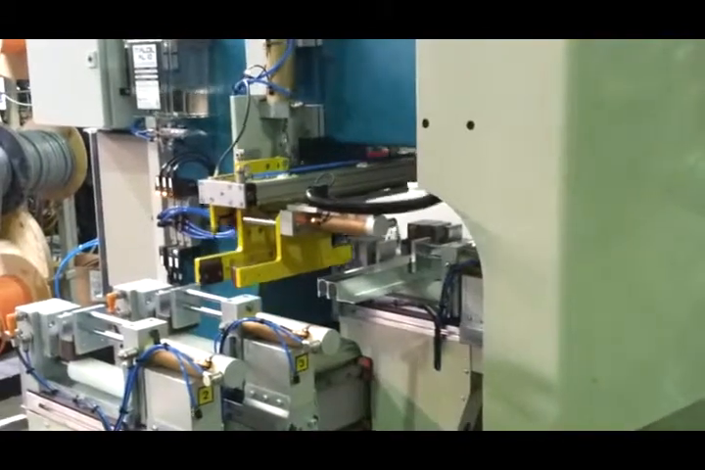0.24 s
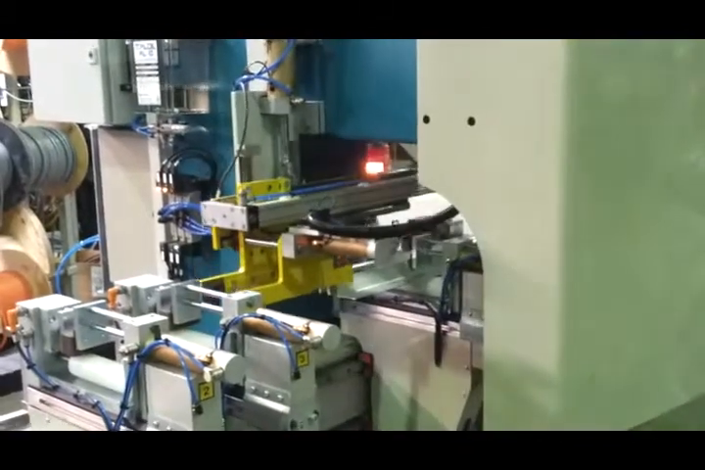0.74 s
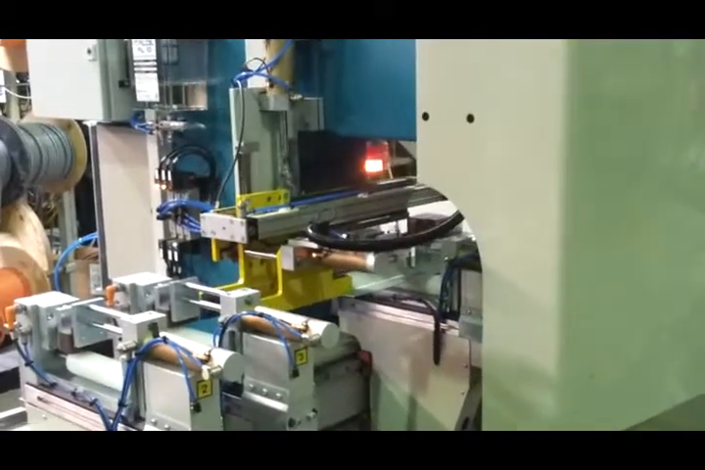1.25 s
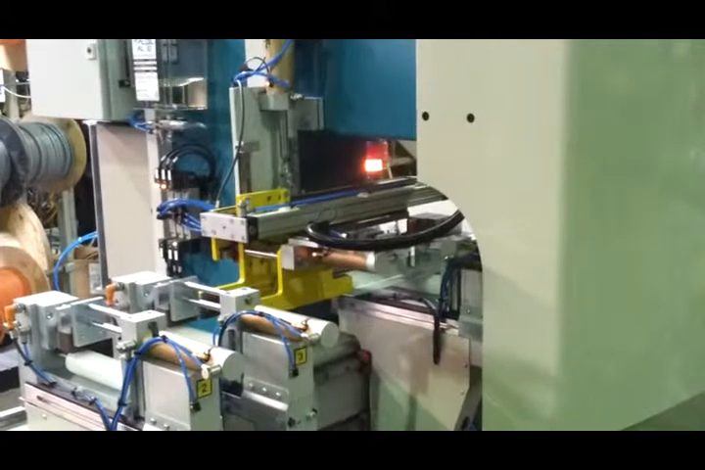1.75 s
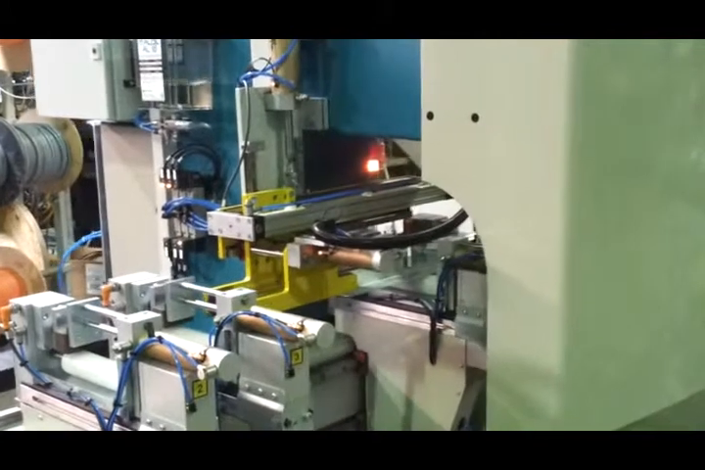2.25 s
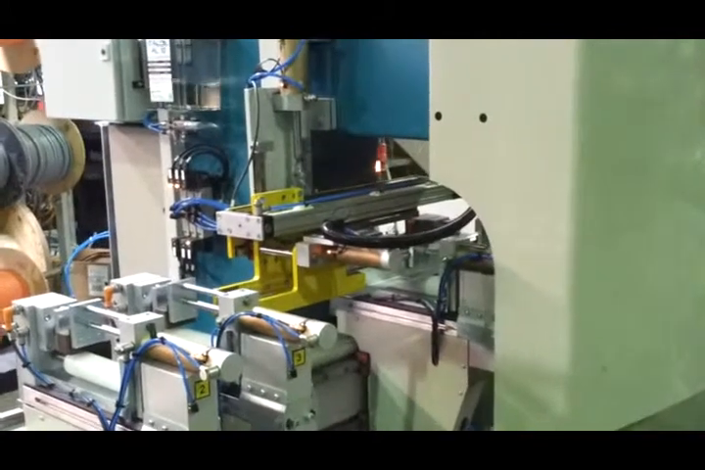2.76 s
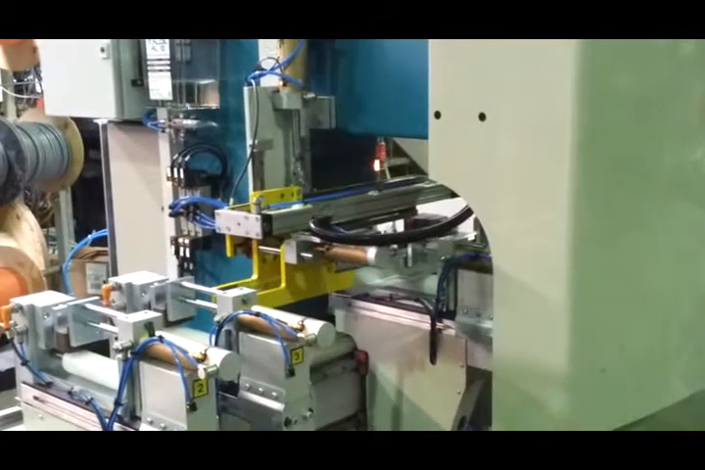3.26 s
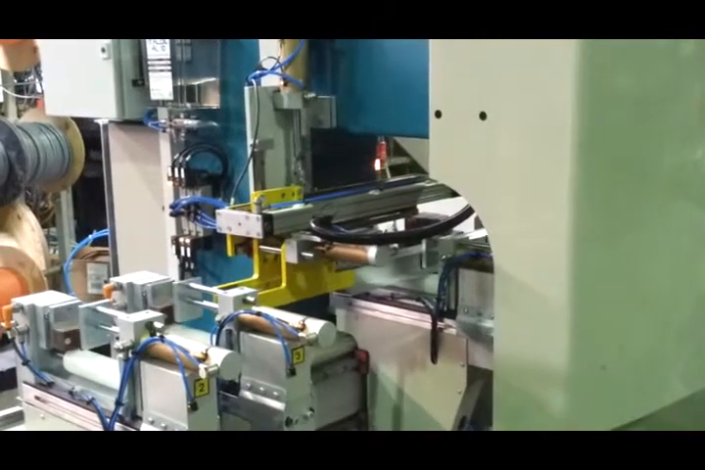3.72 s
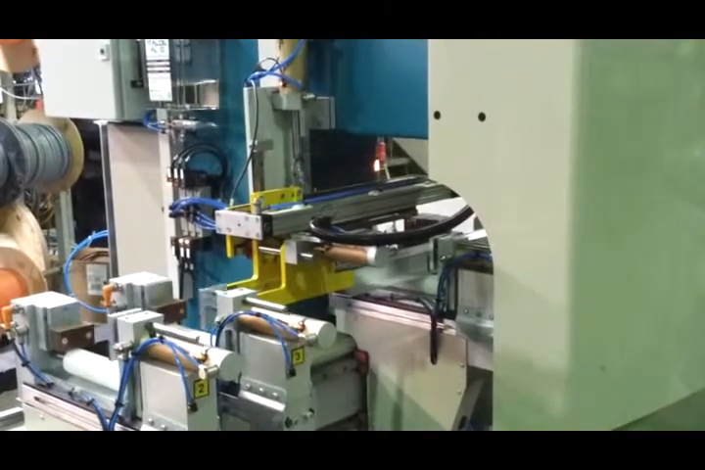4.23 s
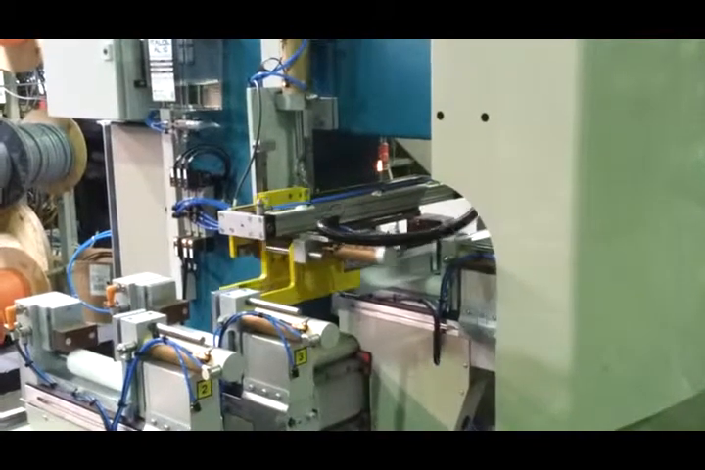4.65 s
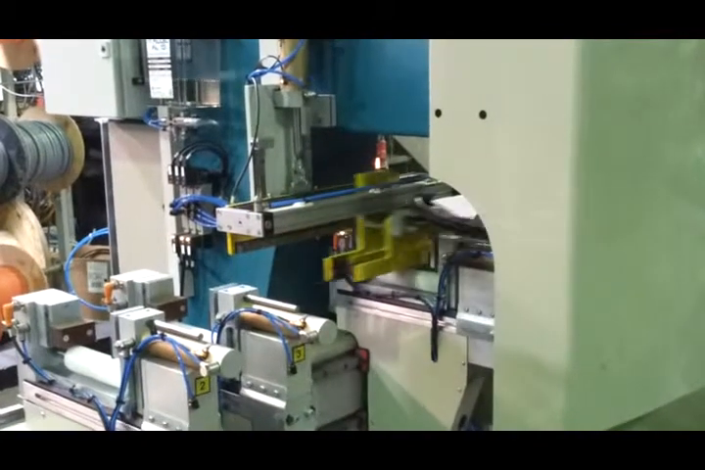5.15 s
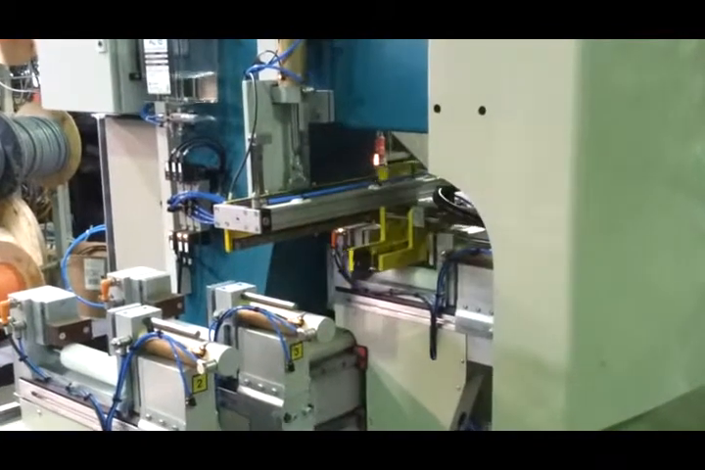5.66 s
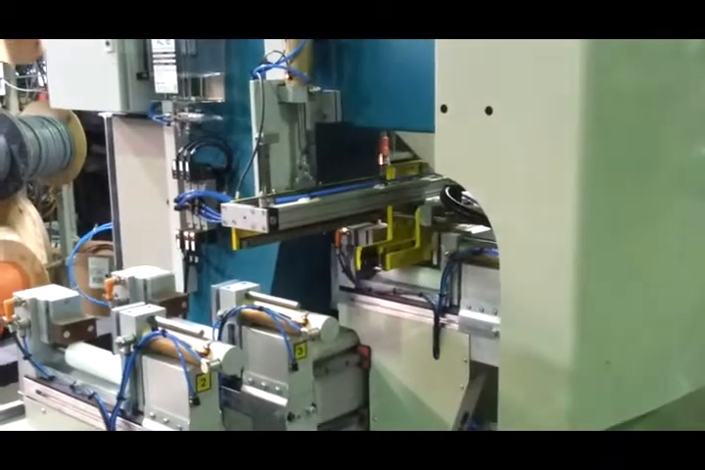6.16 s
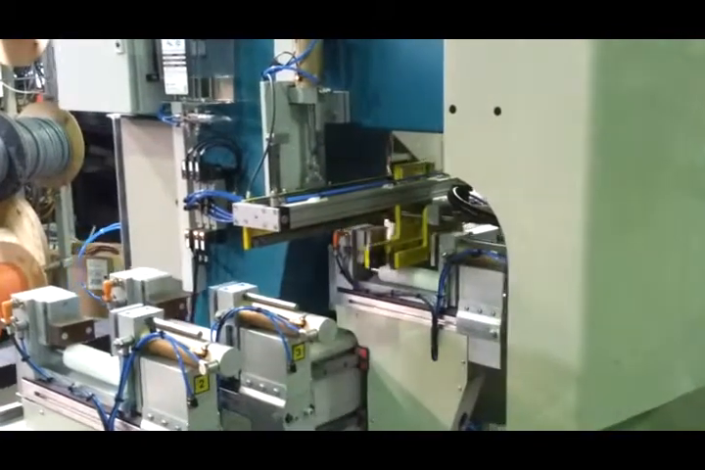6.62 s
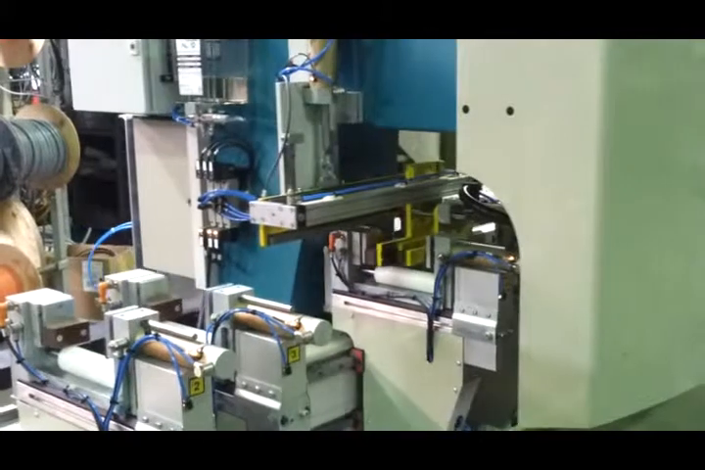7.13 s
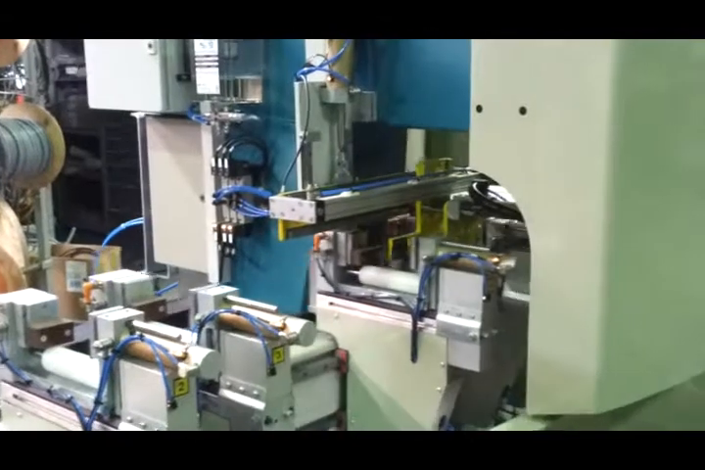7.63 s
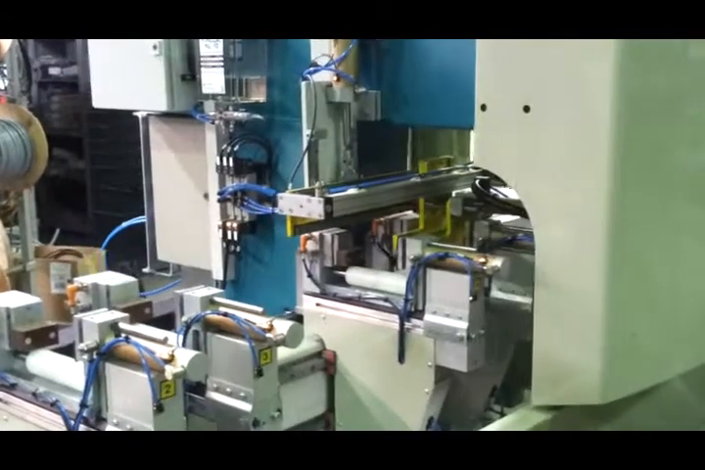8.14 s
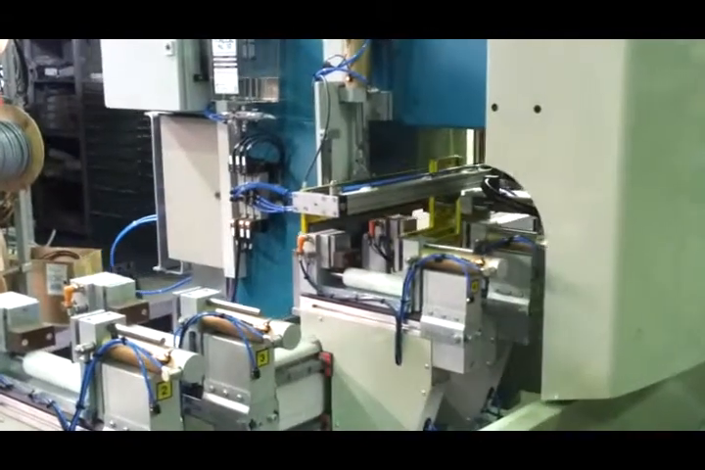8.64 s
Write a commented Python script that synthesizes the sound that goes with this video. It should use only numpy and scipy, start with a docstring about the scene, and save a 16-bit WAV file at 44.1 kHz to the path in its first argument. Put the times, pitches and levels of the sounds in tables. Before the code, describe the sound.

Close stereo pickup of pneumatic machinery in a large workshop, bright and light on bass. A valve puff and falling spindle whine open it, followed by soft thumps and another sharp spit. A chip nozzle blows gently, then only hiss and hum remain. Later, paired air cracks release a strong fading exhaust as a slide rumbles; irregular metal knocks, clacks and whistling puffs continue to the end, with short dull reverberation.

```python
"""A spindle brakes to rest in a falling whine, amid blowing air and the hiss and hum of a large machining hall.
Valves vent with sharp whistling puffs; clamps, levers and slides knock at their end stops.
Cylinders exhaust in long blows, a nozzle blows chips off the work, tones pass and the floor shudders.
Air is spectrally shaped noise, whistles are noisy carriers, knocks are sums of short-lived noisy modes."""
import sys
import numpy as np
from scipy import signal
from scipy.fft import rfft, irfft
from scipy.io import wavfile

SR = 44100
rng = np.random.default_rng(int(sys.argv[2]) if len(sys.argv) > 2 else 0)


def master_out(mix):
    """Clip the mix to full scale and print it as 16-bit PCM to the path in sys.argv[1]."""
    frames = np.transpose(np.atleast_2d(mix))
    ceiling = np.clip(frames, -1, 1)
    pcm = np.round(ceiling * 32767).astype(np.int16)
    wavfile.write(sys.argv[1], SR, pcm)


N = 392049
T = np.arange(N) / SR
HZ = np.fft.rfftfreq(N, 1 / SR)


def amp(db):
    """dB to gain."""
    return 10 ** (np.asarray(db) / 20)


def rms_one(x):
    """Scale to rms 1, both sides together."""
    return x / np.sqrt(np.mean(x ** 2) + 1e-20)


def at_hz(points):
    """Read a table on a log-frequency axis."""
    hz, value = np.transpose(points)
    return np.interp(np.log(HZ + 1), np.log(hz), value)


def panned(left_minus_right_db):
    """Left and right gains."""
    return amp([[left_minus_right_db / 2], [-left_minus_right_db / 2]])


def add(out, start_s, sound):
    """Mix a sound in at a time."""
    i = round(start_s * SR)
    out[..., i:i + sound.shape[-1]] += sound[..., :N - i]


# Left-right likeness of noise. Each row: frequency in Hz, correlation from 0 to 1.
LIKENESS = [(100, 0.75), (300, 0.88), (700, 1), (1500, 0.29), (3000, 0.034), (14000, 0.2)]


def hiss(spectrum, ripple_db):
    """Stereo noise, rms 1, alike in the bass; its spectrum is made uneven by random ripples."""
    mid, side = rfft(rng.standard_normal((2, N)))
    alike = np.clip(at_hz(LIKENESS), 0, 1)
    knots_hz = np.arange(0, SR / 2, 30)
    ripple = np.interp(HZ, knots_hz, rng.standard_normal(len(knots_hz)))
    pair = np.sqrt(1 + alike) * mid + np.sqrt(1 - alike) * side * [[1], [-1]]
    return rms_one(irfft(pair * amp(at_hz(spectrum) + ripple_db * ripple), N))


def whistle(hz, width_hz, alike, steady=0.0):
    """Noisy stereo tone on a pitch curve: slow complex noise plus a steady part on a carrier, rms 1."""
    r = np.exp(-np.pi * width_hz / SR)
    settle = 2000  # samples
    draw = rng.standard_normal((2, 3, len(hz) + settle))
    slow = signal.lfilter([1], [1, -2 * r, r * r], draw[0] + 1j * draw[1])[:, settle:]
    pair = np.sqrt(alike) * slow[0] + np.sqrt(1 - alike) * slow[1:]
    pair = pair / np.sqrt(np.mean(np.abs(pair) ** 2)) + steady
    cycles = np.cumsum(hz) / SR + rng.random()
    return rms_one(np.real(pair * np.exp(2j * np.pi * cycles)))


# Valve puffs. Each row: start in seconds, gust level in dB, opening time in seconds, hold in seconds,
# gust t60 in seconds, settled whistle pitch in Hz, its level in dB, settled upper whistle pitch in Hz,
# its level in dB, lingering whistle level in dB, left minus right in dB.
PUFFS = [(0.183, -27, 0.0014, 0.034, 0.2, 5780, -18, 10200, -18.5, -27, -1),
         (1.076, -38, 0.0027, .017, 0.2, 5950, -38, 10600, -47, -48, 3),
         (1.962, -18, 0.0013, 0.022, 0.13, 5570, -12, 11300, -14.5, -21, 1),
         (4.929, -19, 0.0015, 0.017, 0.6, 5960, -12, 10950, -12.5, -40, -0.5),
         (5.229, -16, 0.01, 0.017, 0.33, 5850, -8, 10140, -11, -45, 0),
         (5.812, -22.5, 0.021, 0.016, 0.19, 5290, -29, 10300, -36, -36, -2),
         (6.478, -15, 0.0015, 0.019, 0.075, 5776, -13, 11510, -7, -15.5, -0.5),
         (6.914, -22.5, 0.0093, 0.052, 0.38, 5790, -23.5, 10200, -21, -30, -1.5),
         (7.573, -23.5, 0.0073, 0.039, 0.42, 5700, -23, 10200, -18.5, -46, -1),
         (8.462, -25, 0.02, 0.033, 0.43, 5780, -15, 11200, -26.5, -17.5, -2)]
# Colour of the gust. Each row: frequency in Hz, relative density in dB per Hz.
GUST = [(880, -5), (1500, -8), (2780, -6.5), (3000, -2.5), (3970, -6), (5000, -2), (5840, -2), (8830, -4.5),
        (10800, -4.5), (14200, -12), (15000, -70)]
# A valve that snaps open whistles sharp by up to this share; one slower than SNAP_S much less.
SHARP_START, SNAP_S, SAG_S = .45, 0.0048, .008
WHISTLE_T60_S, LINGER_T60_S = 0.034, 0.75


def puffs():
    """Air bursts from the port; whistles start sharp, sag as the pressure drops, and the lower one lingers."""
    out, gust, t = np.zeros((2, N)), hiss(GUST, ripple_db=1.5), T[:SR]
    for start_s, gust_db, rise_s, hold_s, t60_s, hz, db, upper_hz, upper_db, linger_db, pan_db in PUFFS:
        opening = np.clip(t / max(rise_s, 1e-4), 0, 1) ** 2
        closed_s = np.maximum(t - rise_s - hold_s, 0)
        sag = SHARP_START * np.exp(-rise_s / SNAP_S - t / SAG_S)
        lower_curve = hz * (1 + sag)
        lower = amp(db) * whistle(lower_curve, 500, 0.17)
        upper = amp(upper_db) * whistle(upper_hz * (1 + 0.3 * sag), 1160, 0.2)
        whistles = amp(-60 * closed_s / WHISTLE_T60_S) * (lower + upper)
        linger = amp(linger_db - 60 * t / LINGER_T60_S) * whistle(lower_curve, 80, 0.32, steady=0.9)
        i = min(round(start_s * SR), N - SR)
        flow = amp(gust_db - 60 * closed_s / t60_s) * gust[:, i:i + SR]
        add(out, start_s, panned(pan_db) * opening * (flow + whistles + linger))
    return out


# End-stop knocks. Each row: start in seconds, part, level in dB, left minus right in dB.
KNOCKS = [(0.199, "spool", 1.5, -1), (1.044, "buffer", -27.5, 0), (1.269, "buffer", -33, 6),
          (1.493, "buffer", -21.5, 1), (1.55, "buffer", -45, 4), (1.976, "spool", 0, -0.5),
          (4.943, "spool", 1.5, -1), (5.241, "spool", 2.5, 2.0), (5.244, "carriage", -15.5, -0.5),
          (5.83, "spool", -6.5, 3), (5.889, "lever", -16, 1), (6.299, "buffer", -26, -3),
          (6.486, "spool", 2.5, -1), (6.753, "clamp", -8, -0.5), (6.996, "lever", -12.5, 1),
          (7.063, "jaw", -7, -2.5), (7.415, "clamp", -8.5, 1.5), (7.653, "lever", -14, -0.5),
          (7.719, "jaw", -7, 1.5), (8.475, "buffer", -27.5, -1)]
# How each part excites the frame. Each entry: thud, ring, body, clack, clink and tick levels in dB,
# reference t60 in seconds.
PARTS = {"spool": (-37.5, -46, -23.5, -22.5, -12, -2, 0.39),
         "buffer": (-1.5, -0.5, 2.5, -22, -18, -16, 0.23),
         "lever": (-15.5, -11, 0.5, -1.5, -0.5, -21, 0.34), "clamp": (-25, -4.5, -4.5, -2, 2.5, -7, 0.23),
         "carriage": (-1, -14.5, -12, -25, -25, -25, 0.12), "jaw": (-18, -18.5, -13, 1, -16, 2.5, 0.59)}
# Frame modes, one row for each of the six levels of a part, low to high. Each row: share of the reference t60,
# modes as frequency in Hz, width in Hz, relative level in dB.
FRAME = [(2.24, [(231, 70, -6), (331, 140, -5)]), (2.08, [(537, 45, -6), (590, 37, -11.5),
         (652.5, 61, -5)]), (0.84, [(1016.6, 780, -1), (1312, 520, -0.5), (1752, 300, -2.5)]),
         (0.7, [(2195, 700, -9), (2760, 390, -7.5), (3630, 2600, -7)]), (1.23, [(4370, 4500, -4.5),
         (5640, 6400, 8)]), (0.26, [(7875, 5100, -2), (10640, 2300, -6), (12930, 7100, -5)])]


def knocks():
    """Each blow cracks, then rattles the loose, damped modes of the frame; lows swell later and last longer."""
    out, t = np.zeros((2, N)), T[:SR // 2]
    crack = 1 + 0.69 * amp(-60 * t / 0.18)
    for start_s, part, blow_db, pan_db in KNOCKS:
        *levels_db, t60_s = PARTS[part]
        for level_db, (lasting, modes) in zip(levels_db, FRAME):
            ring = 0
            for hz, width_hz, db in modes:
                alike = max(0.44, 1 - hz / 3000)
                ring = ring + amp(db) * whistle(np.full(len(t), hz), width_hz, alike, steady=0.21)
            swell = 1 - np.exp(-t / (0.0011 * lasting ** 2))
            rattle = ring * swell * amp(-60 * t / (t60_s * lasting)) * crack
            add(out, start_s, panned(pan_db) * amp(blow_db + level_db) * rattle / np.abs(rattle).max())
    return out


SPINDLE_HZ, SPINDLE_STOP_S = 1890, 1.175  # whine at full speed, time of standstill
# Whine strands ahead of the housing. Each row: ratio to the whine pitch, level at full speed in dB,
# level near rest in dB.
SPINDLE_STRANDS = [(1, -47, -58), (2, -51, -45), (3, -46, -28), (4, -35, -46), (4.3, -41, -56)]
# Housing resonances. Each row: frequency in Hz, gain in dB.
HOUSING = [(200, -14), (600, -12), (950, -8), (1200, 10), (1550, 12), (1800, 3), (2300, 1), (2900, -6),
           (4200, -9), (5200, 2), (7500, 2)]


def spindle():
    """Speed falls evenly to rest; whine strands, each at its own ratio to it, light up where the housing resonates."""
    speed = np.clip(1 - T[:2 * SR] / SPINDLE_STOP_S, 0, 1)
    whine = 0
    for ratio, fast_db, slow_db in SPINDLE_STRANDS:
        level = amp(slow_db + (fast_db - slow_db) * speed)
        whine = whine + level * whistle(ratio * SPINDLE_HZ * speed, 70, .6, steady=.8)
    whine = whine * np.minimum(speed / .08, 1)  # silent at rest
    return irfft(rfft(whine, N) * amp(at_hz(HOUSING)), N)


def strokes(rows, rest_db, rise_s, fall_s):
    """Gain over time: a resting level, and strokes that swell, change evenly in dB and die away; powers add."""
    power = amp(rest_db) ** 2
    for start_s, end_s, first_db, last_db in rows:
        edge = np.clip((T - start_s) / rise_s, 0, 1) * np.clip(1 - (T - end_s) / fall_s, 0, 1)
        level = amp(np.interp(T, [start_s, end_s], [first_db, last_db]))
        power = power + (edge * level) ** 2
    return np.sqrt(power)


# Cylinder exhausts. Each row: start in seconds, end in seconds, level at start in dB, level at end in dB.
BLOWS = [(-.1, .2, -34, -34.5), (.2, 1.08, -26.5, -32.5), (5.24, 6.4, -17.5, -29.5),
         (6.55, 7.2, -29.5, -29.5), (7.25, 7.6, -30, -40)]
# Exhaust colour. Each row: frequency in Hz, relative density in dB per Hz.
BLOW = [(710, -62), (1200, -0.5), (1390, -16.5), (1890, -2), (2380, -14.5), (2740, -2.5), (3110, -2),
        (4310, 1), (5550, 0.5), (6720, 2.5), (10300, -7.5), (13900, -10), (15000, -10.5)]
BLOW_REST_DB, BLOW_RISE_S, BLOW_FALL_S = -36, .06, 0.057
# Chip nozzle. Each row: start in seconds, end in seconds, level at start in dB, level at end in dB.
NOZZLE_BLOWS = [(2.0, 3.34, -34.5, -34.5)]
# Nozzle colour. Each row: frequency in Hz, relative density in dB per Hz.
NOZZLE = [(900, -28), (1300, -9), (1650, 3), (2050, -7), (2330, 1), (2700, -4), (3200, 2.5), (3680, -12),
          (4200, 2.5), (4650, -3), (5600, -1), (6500, -16), (8100, -3), (9300, -18), (14000, -16)]
# Slide strokes. Each row: start in seconds, end in seconds, level at start in dB, level at end in dB.
SLIDES = [(.1, .5, -32, -37), (.45, 1.05, -28, -29.5), (3.3, 4.0, -45, -53), (5.27, 5.5, -30, -38),
          (5.8, 6.4, -30.5, -42), (6.55, 7.35, -33, -31), (7.4, 7.9, -34.5, -33)]
# Slide rumble colour. Each row: frequency in Hz, relative density in dB per Hz.
RUMBLE = [(110, -33), (180, -9), (259, -3), (323, -4.5), (458, -3), (522, -6), (609, -2.5), (780, -0.5),
          (1100, -3.5), (1360, -0.5), (2510, -5), (4000, -29), (5200, -41), (8800, -120)]
SLIDE_REST_DB, SLIDE_RISE_S, SLIDE_FALL_S = -39.5, 0.11, 0.26


def blows_and_slides():
    """Cylinder exhausts, chip nozzle and slide rumble: coloured noise under stroke gains."""
    blow = strokes(BLOWS, BLOW_REST_DB, BLOW_RISE_S, BLOW_FALL_S) * hiss(BLOW, ripple_db=2.5)
    nozzle = strokes(NOZZLE_BLOWS, -np.inf, BLOW_RISE_S, BLOW_FALL_S) * hiss(NOZZLE, ripple_db=3.0)
    slide = strokes(SLIDES, SLIDE_REST_DB, SLIDE_RISE_S, SLIDE_FALL_S) * hiss(RUMBLE, ripple_db=4.0)
    return blow + nozzle + slide


# Drive groans and whistling leaks. Each row: start in seconds, end in seconds, pitch in Hz, width in Hz,
# level in dB.
TONES = [(.25, .43, 1360, 50, -36), (.68, 1.02, 300, 25, -38), (.88, .96, 295, 15, -34),
         (1.03, 1.07, 1300, 40, -31), (1.255, 1.29, 1290, 40, -32), (.8, 1.12, 8070, 140, -42),
         (.3, 1.12, 5900, 200, -41), (2.0, 3.35, 8100, 140, -53), (4.96, 5.23, 8100, 140, -40),
         (4.95, 5.22, 4220, 350, -38), (6.55, 7.25, 8100, 140, -44)]


def tones():
    """Groans of a drive and whistling leaks: wavering narrow-band tones that come and go."""
    out = np.zeros((2, N))
    for start_s, end_s, hz, width_hz, db in TONES:
        t = T[:round((end_s - start_s) * SR)]
        fade = np.clip(np.minimum(t, t[::-1]) / .012, 0, 1)
        add(out, start_s, amp(db) * fade * whistle(np.full(len(t), hz), width_hz, 0.52))
    return out


# Strong floor lumps. Each row: start in seconds, level in dB.
SHUDDERS = [(.84, -39), (1.5, -45), (3.36, -37.5), (5.25, -40), (6.48, -53), (7.08, -37.5), (7.76, -35),
            (8.46, -48)]
# Shudder colour. Each row: frequency in Hz, relative density in dB per Hz.
SHUDDER = [(40, -30), (70, -9.5), (110, -5), (160, -3), (230, -10), (400, -60)]
SHUDDER_RISE_S, SHUDDER_T60_S = 0.015, 1.56
LUMPS_DB, LUMPS_SPREAD_DB, LUMP_S = -64, 10, .06  # weak lumps by chance: middle, spread, spacing


def shudder():
    """The floor shudders: low noise in lumps, a few strong ones that die away, many weak ones."""
    knots_s = np.arange(0, N / SR + 1, LUMP_S)
    chance = np.interp(T, knots_s, rng.standard_normal(len(knots_s)))
    gain = amp(LUMPS_DB + LUMPS_SPREAD_DB * chance)
    for start_s, db in SHUDDERS:
        rise = np.clip((T - start_s) / SHUDDER_RISE_S, 0, 1)
        gain = gain + rise * amp(db - 60 * np.maximum(T - start_s, 0) / SHUDDER_T60_S)
    return gain * hiss(SHUDDER, ripple_db=1.5)


# Steady air hiss colour. Each row: frequency in Hz, relative density in dB per Hz.
AIR = [(1060, -31), (1800, -17), (2250, -8), (2800, -0.5), (3500, -0.5), (4600, -6), (5400, 3.5),
       (6100, -4), (7300, -0.5), (8800, -6.5), (10000, -9), (11000, -5), (12300, 1.5), (14400, -10.5)]
# Motor drone colour. Each row: frequency in Hz, relative density in dB per Hz.
MOTORS = [(100, -46), (140, -24), (190, -9), (404, -6.5), (444, -2.5), (637, -5.5), (691, -16), (751, -4),
          (1020, -11.5), (1240, -8.5), (2000, -22), (2600, -43), (4400, -120)]
# Motor hum lines. Each row: frequency in Hz, rms level in dB.
HUM = [(436, -51), (461, -49.5), (537, -53), (627, -54.5), (655, -53), (1048, -52)]
AIR_DB, MOTORS_DB = -34.5, -41


def shop():
    """Steady air hiss, motor drone and its slightly wavering hum lines."""
    hum = sum(amp(db) * whistle(np.full(N, hz), 4.2, 0.98, steady=2.3) for hz, db in HUM)
    return amp(AIR_DB) * hiss(AIR, ripple_db=4.0) + amp(MOTORS_DB) * hiss(MOTORS, ripple_db=2.0) + hum


HALL_T60_S, HALL_DB, HALL_CUT_HZ = 0.47, -7, 5800


def hall(x):
    """Reverberation: convolution with a dull decaying noise tail, another for each side."""
    t = T[:SR]
    tail = rng.standard_normal((2, SR)) * amp(-60 * t / HALL_T60_S) * (1 - np.exp(-t / 0.0033))
    tail = signal.sosfilt(signal.butter(1, HALL_CUT_HZ, fs=SR, output="sos"), tail)
    return signal.fftconvolve(x, tail / np.sqrt(np.sum(tail[0] ** 2)), axes=1)[:, :N]


def scene():
    """All sources; the hall answers the sudden ones."""
    sudden = puffs() + knocks()
    moving = spindle() + blows_and_slides() + tones()
    return sudden + amp(HALL_DB) * hall(sudden) + moving + shudder() + shop()


# Colour difference of the two ports. Each row: frequency in Hz, left minus right in dB.
EARS = [(92, 0.5), (140, 5), (210, 2), (330, 0), (500, 0), (760, 0.0), (1170, 3.0), (1780, 5), (2720, -0.5),
        (4160, -1.0), (6360, 2), (9720, -8.5), (14800, 7)]
LEFT_LAG_S, BASS_CUT_HZ, TOP_CUT_HZ = 0.0002496, 252, 14480


def record(dry):
    """The two ports differ in colour, the left one is farther away; bass is cut, peaks clip, the top is cut."""
    colour = amp(at_hz(EARS) / 2 * [[1], [-1]])
    lag = np.exp(-2j * np.pi * HZ * [[LEFT_LAG_S], [0]])
    heard = irfft(rfft(dry) * colour * lag, N)
    bass_cut = signal.butter(2, BASS_CUT_HZ, "high", fs=SR, output="sos")
    clipped = np.clip(signal.sosfilt(bass_cut, heard), -1, 1)
    top_cut = signal.ellip(12, .5, 70, TOP_CUT_HZ, fs=SR, output="sos")
    return np.clip(signal.sosfilt(top_cut, clipped), -1, 1)


dry = scene()
out = record(dry)
master_out(out)
```